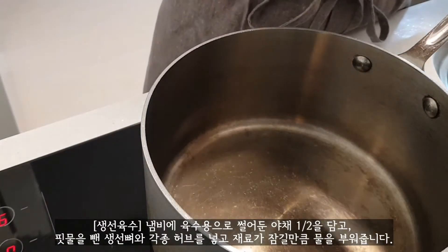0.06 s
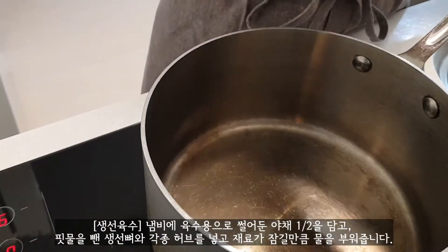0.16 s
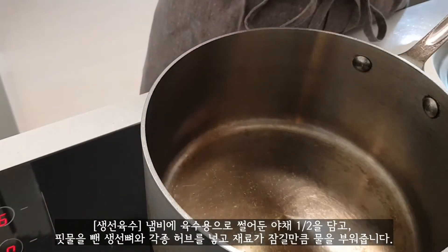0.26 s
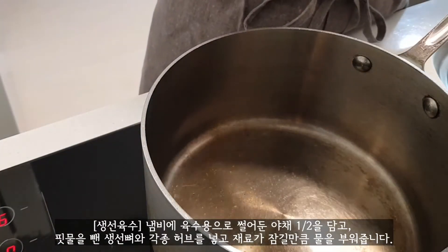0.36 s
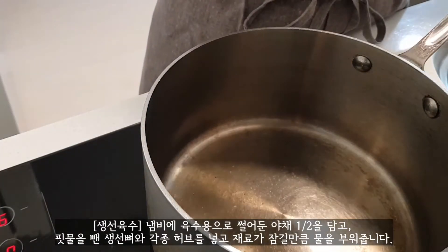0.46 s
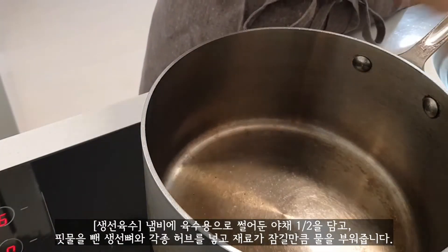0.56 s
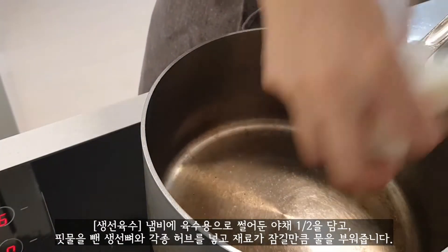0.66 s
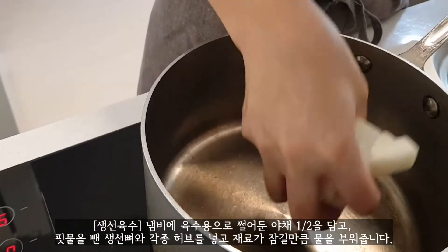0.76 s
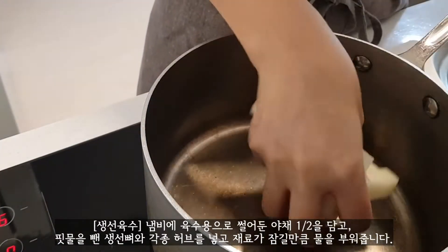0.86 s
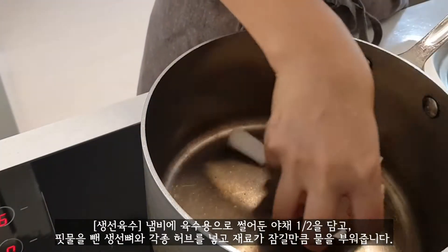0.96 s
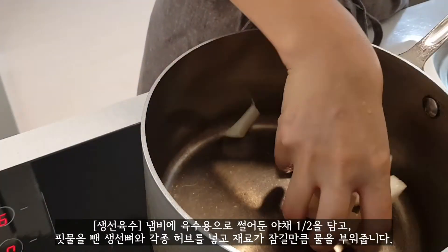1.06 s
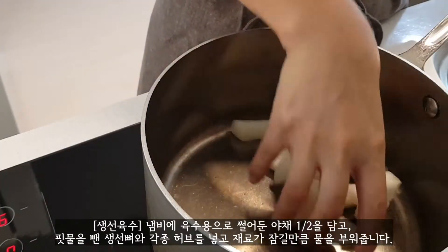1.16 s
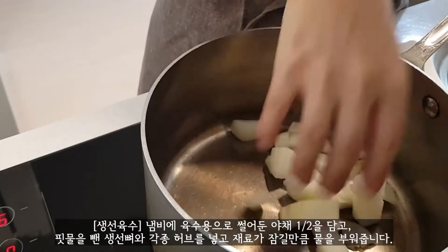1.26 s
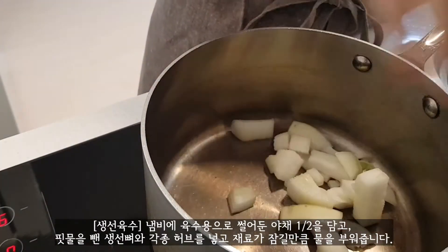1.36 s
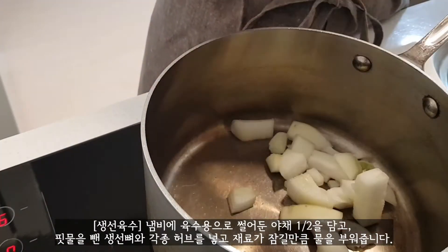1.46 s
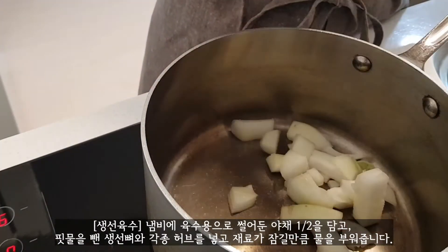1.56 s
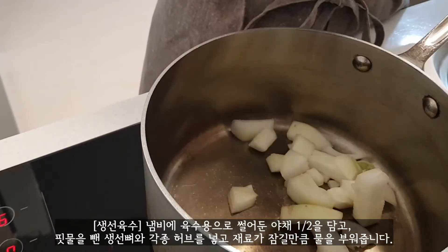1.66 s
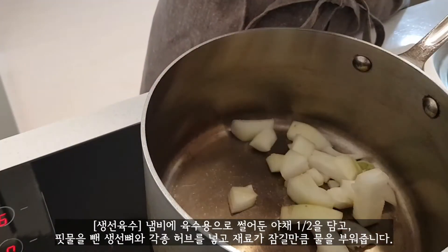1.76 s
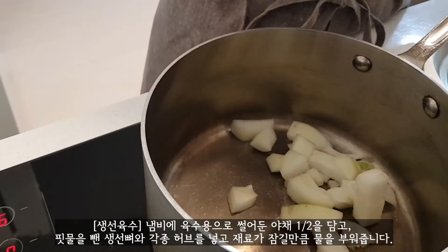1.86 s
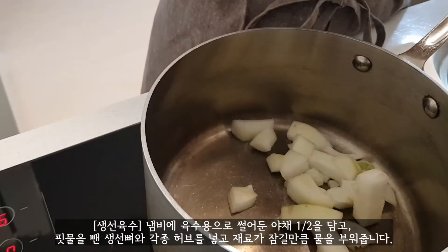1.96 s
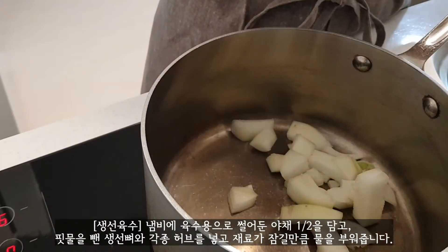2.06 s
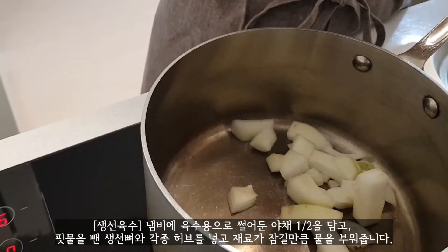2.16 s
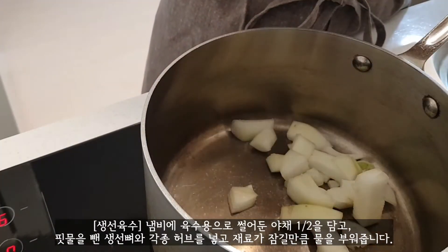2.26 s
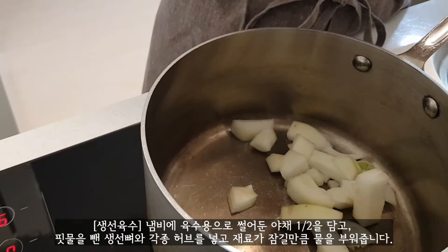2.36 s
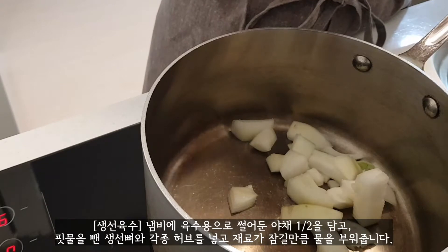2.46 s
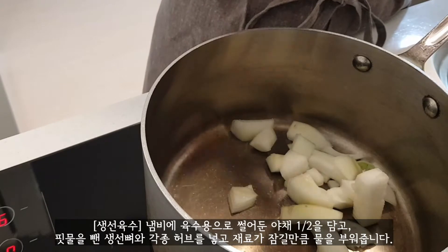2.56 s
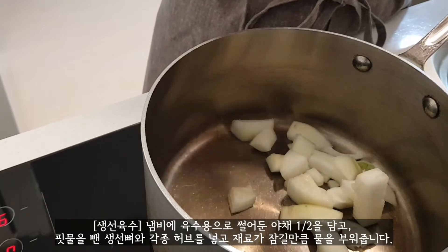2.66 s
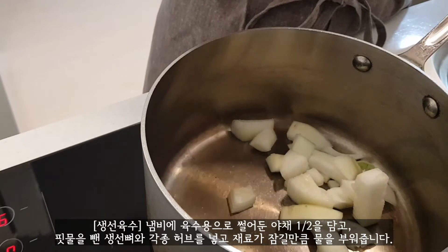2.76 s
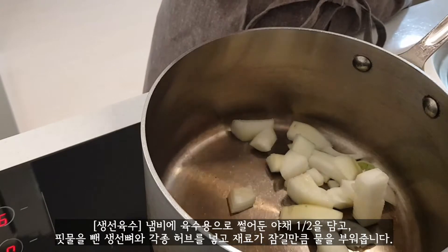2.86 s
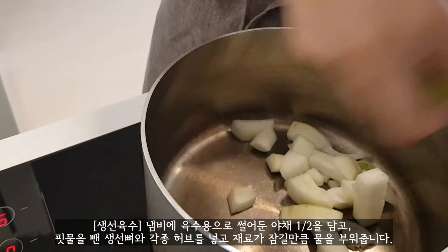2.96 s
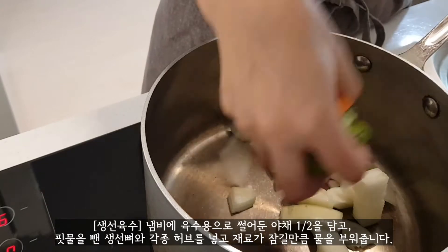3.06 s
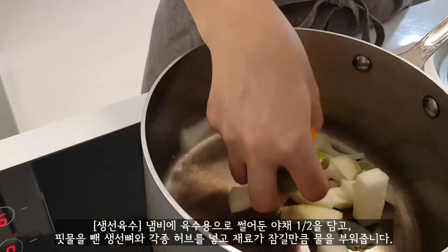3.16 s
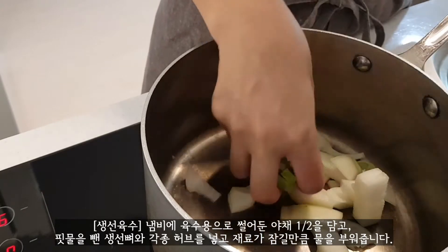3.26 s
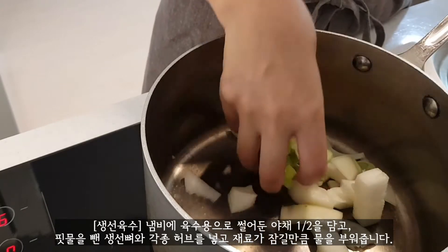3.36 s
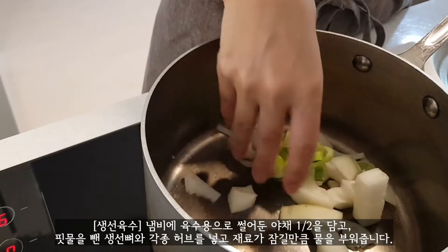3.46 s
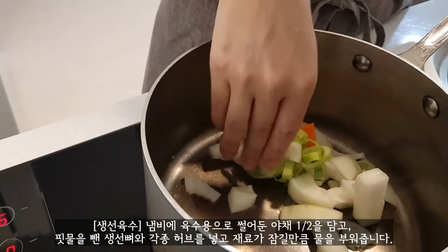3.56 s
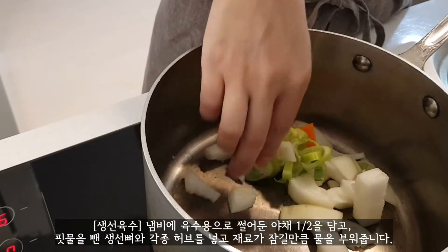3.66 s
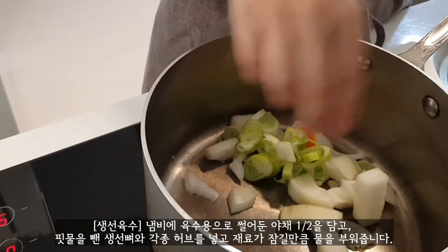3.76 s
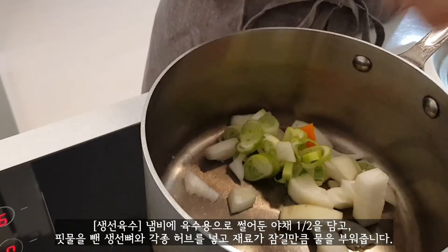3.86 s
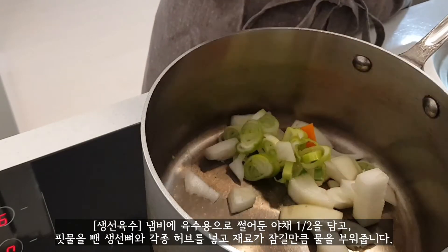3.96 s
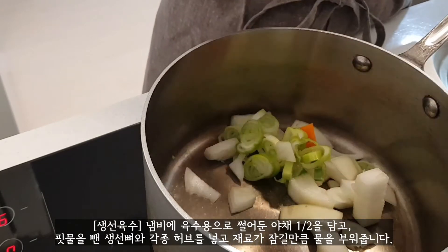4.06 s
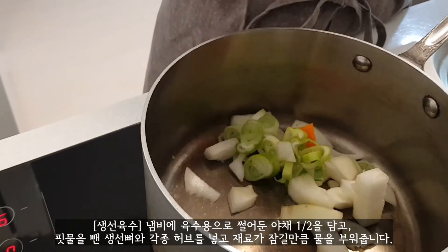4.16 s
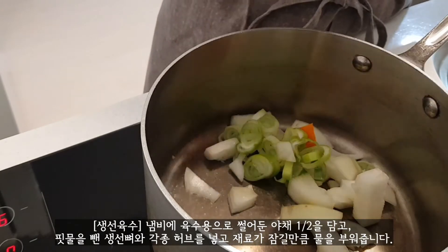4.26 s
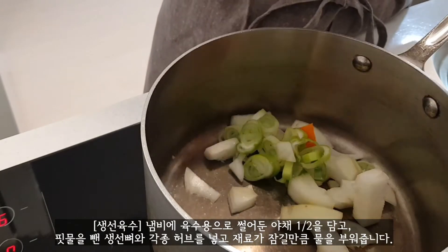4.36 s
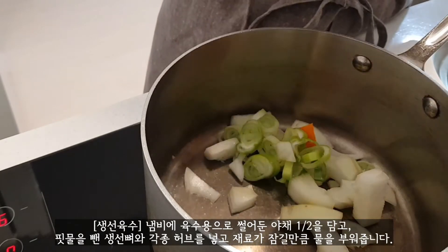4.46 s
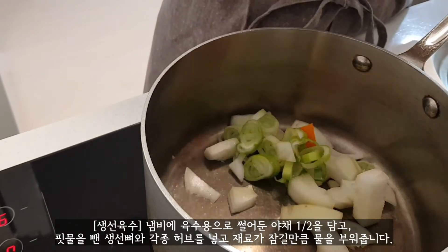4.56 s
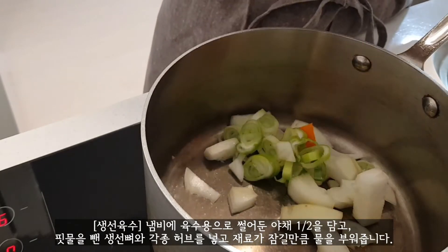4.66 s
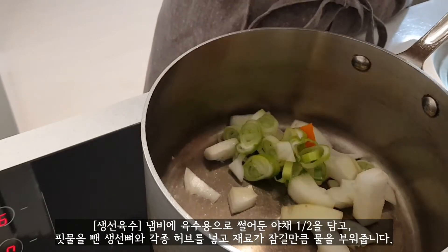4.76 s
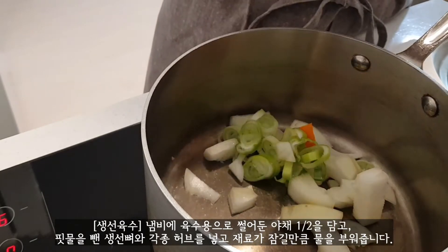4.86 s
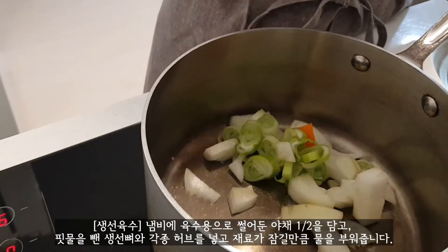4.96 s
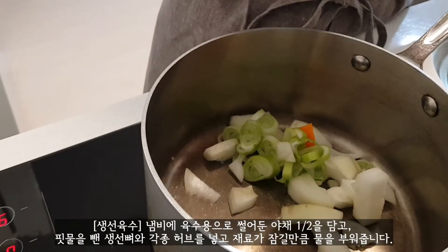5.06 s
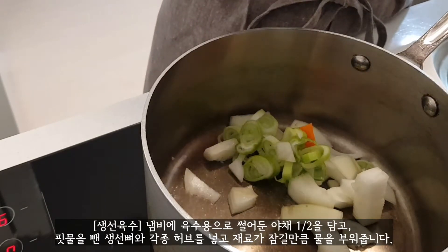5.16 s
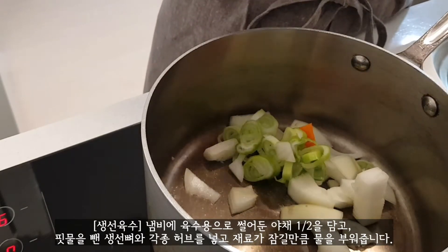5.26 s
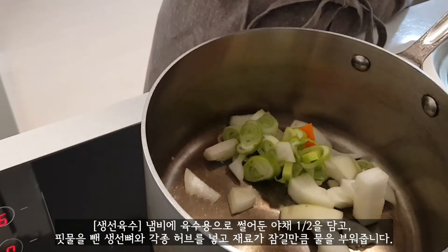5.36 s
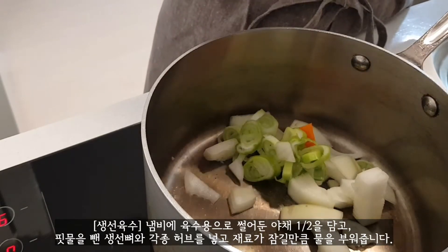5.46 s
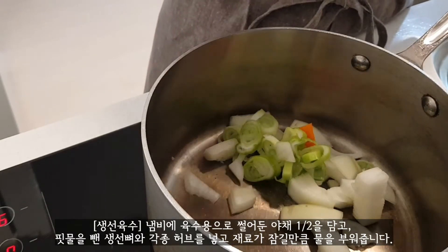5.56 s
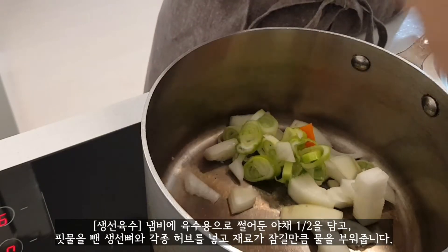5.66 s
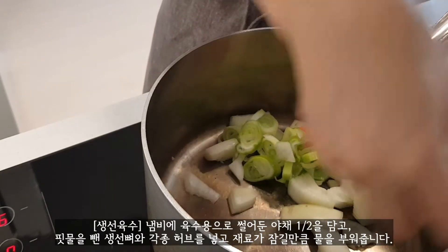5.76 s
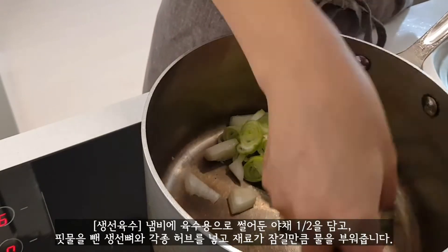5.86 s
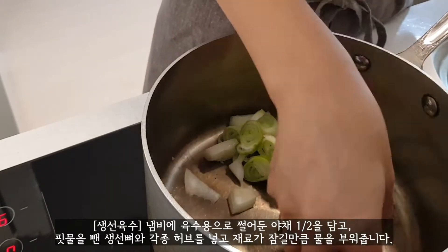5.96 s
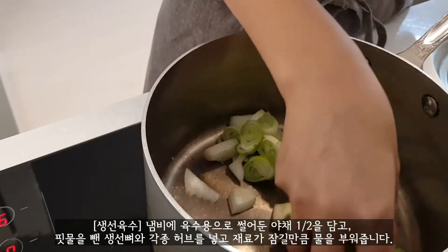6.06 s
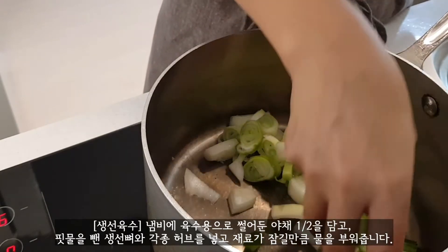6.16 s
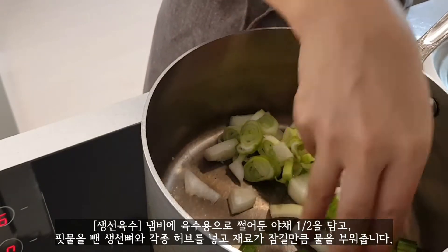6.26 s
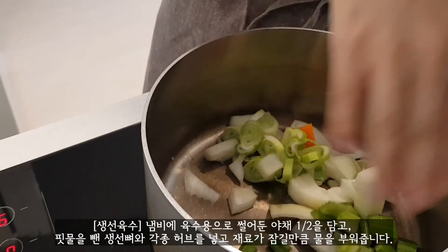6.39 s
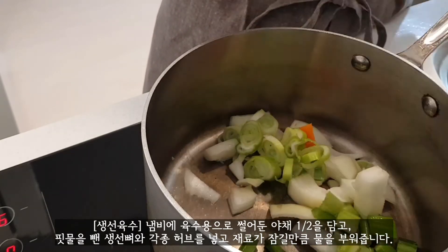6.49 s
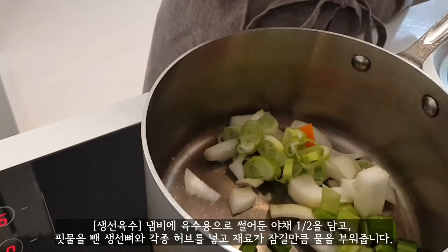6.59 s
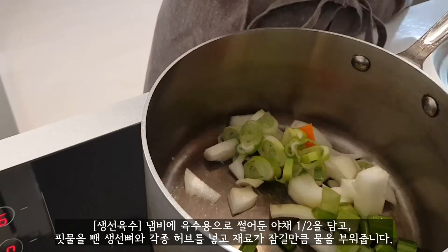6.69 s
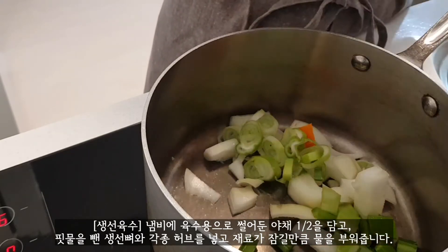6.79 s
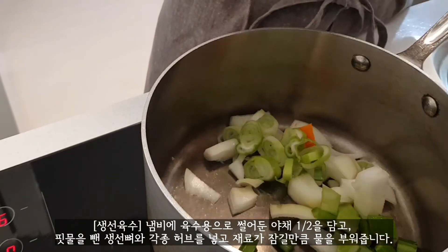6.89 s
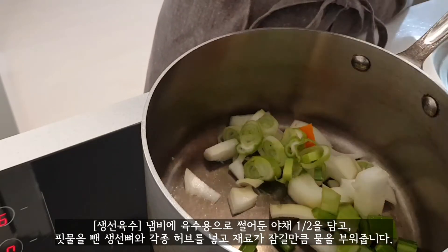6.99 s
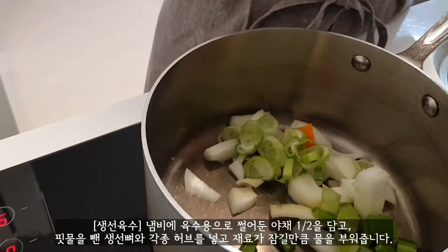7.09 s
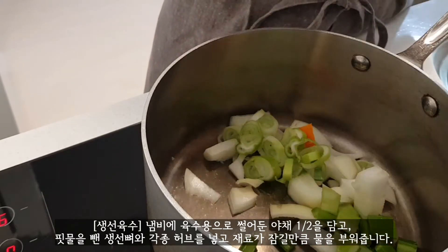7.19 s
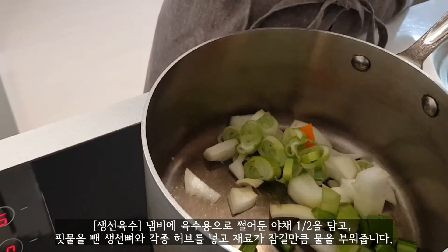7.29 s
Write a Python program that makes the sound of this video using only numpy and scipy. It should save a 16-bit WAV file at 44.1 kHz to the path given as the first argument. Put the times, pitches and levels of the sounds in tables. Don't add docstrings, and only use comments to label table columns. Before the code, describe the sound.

A close stereo kitchen scene lasting about 7.5 seconds, with a constant fine, high hiss like a gas flame and a low rumbling extractor fan with an unsteady hum. From 0.97 to 1.4 s a handful of chopped vegetables patters into a steel saucepan: short, damped, hollow taps, small wet clicks and faint pan thuds. At 3.1 to 3.3 s a few more pieces drop. Two dull counter bumps come at 4.3 s, then at 4.7 s an unseen metal bowl lands with a loud bright clank, bouncing once a tenth of a second later, its short ring quickly damped. The background dips slightly. At 5.85 s a heavy low thump and hand knock on the pan precede the fullest handful, pattering until about 6.5 s. Dull room reflections fade; hiss and hum continue alone, swelling back near 7.3 s, with a very faint airy whistle at the end.

```python
import sys
import numpy as np
from scipy import signal
from scipy.fft import rfft, irfft
from scipy.io import wavfile
from scipy.ndimage import uniform_filter1d, map_coordinates

SR = 44100
rng = np.random.default_rng(int(sys.argv[2]) if len(sys.argv) > 2 else 0)


def elevation(decibels):
    levels = np.asarray(decibels, float)
    return 10 ** (levels / 20)


def digitize_waveform(pressure):
    field = np.atleast_2d(pressure).T
    bounded = np.clip(field, -1, 1)
    quanta = np.round(bounded * 32767).astype(np.int16)
    wavfile.write(sys.argv[1], SR, quanta)


N = 323253

# start_s, peak_db, brightness_db, favoured_mode_hz
PIECES = [(0.966, -34.5, -3, 1290), (0.984, -39.5, -17, 930), (0.999, -41.5, -4, 1220),
          (1.024, -38, -5, 1300), (1.07, -37.5, -10, 1150), (1.087, -39, -15, 960), (1.104, -39, -21, 930),
          (1.17, -35.5, -11, 910), (1.179, -39, -28, 937), (1.21, -33, -29, 845), (1.249, -46.5, -6, 1120),
          (1.277, -41, -27, 930), (1.373, -41.5, -7.5, 1100), (3.123, -31, -11.5, 890),
          (3.151, -56, -20, 1110), (3.295, -42, -7, 1090), (5.862, -28.5, -14, 1010),
          (6.008, -31.5, -12, 1150), (6.071, -42.5, -21, 1230), (6.112, -35, -8, 1160),
          (6.146, -31.5, -20.5, 1020), (6.196, -33, -18, 1100), (6.228, -35, -11, 955),
          (6.243, -34.5, -6, 1110), (6.279, -43, -8, 947), (6.3, -39, -7, 1100), (6.339, -46, -13, 1120),
          (6.429, -45, -25, 1100), (6.451, -29, -9, 1220), (6.489, -41, -12, 1220)]
PAN_MODE_HZ = [520, 700, 930, 1110, 1220, 1480, 1900, 2090, 2650, 3300]
# level_db, t60_s
PAN_MODES = [(-7, .06), (-3, 0.084), (1.5, 0.069), (-4, 0.082), (-4.5, 0.25), (-3.5, 0.045), (1, 0.049),
             (0.5, 0.069), (-6, 0.04), (-5.5, 0.046)]
# start_s, level_db
PAN_ROCKS = [(0.999, -40.5), (1.024, -37.5), (1.07, -40), (1.144, -42), (1.209, -43), (1.277, -39.5),
             (3.123, -40), (3.296, -45), (5.862, -34), (6.01, -40), (6.112, -40), (6.16, -39), (6.451, -45)]
# pitch_hz, density_db
THUD_COLOUR = [(40, -29), (90, 7), (170, 0), (280, -17), (500, -19.5), (900, -38.5)]
# start_s, peak_db
SKIN_TICKS = [(1, -40), (1.019, -40), (1.0446, -39), (1.072, -42), (1.0897, -45), (1.211, -39.5),
              (1.2494, -45), (1.2894, -49)]
# start_s, swell_s, fade_s, top_db
SETTLING = [
    (.96, .23, 0.22, -55.5),
    (3.11, 0.044, .2, -71),
    (6, .11, .45, -53.5),
]
# start_s, ring_db, crack_tilt_db_per_octave, beating_pair_db, beat_start_rad
BOWL_CONTACTS = [
    (4.691, -16, 1.5, -21, -0.25),
    (4.7875, -23, -3, -23, -0.81),
]
BOWL_CRACK_DB = (-21, -26.5)
BOWL_MODE_HZ = [501, 650, 765, 880, 1556, 1803, 2087, 2306, 2352, 2400, 2611, 2684, 2780, 3435, 3577, 3704,
                4240, 4554, 4651, 4971, 5505, 1259, 6498, 7060, 7843, 8600, 10140, 270, 7280]
# first_level_db, first_t60_s, second_level_db, second_t60_s
BOWL_MODES = [(-16.5, 0.2, -13, 0.12), (-14.5, 0.17, -7, 0.35), (-4, 0.09, -10, 0.31),
              (-16, .08, -12, 0.061), (-19, 0.15, -14, 0.23), (-15, 0.1, -12, 0.19),
              (-5.5, 0.088, -6, 0.086), (-7, 0.14, -15.5, 0.2), (0, 0.13, -8, 0.19), (-22, 0.13, -4, 0.13),
              (-15, 0.148, -8, 0.16), (-1, 0.2, -11, 0.15), (1, 0.092, -22, 0.12), (-6, 0.25, -15, 0.19),
              (-1, 0.16, 1, 0.1), (-18, 0.35, -11, .3), (-3.5, 0.13, -3, 0.067), (-8.5, 0.12, -11, 0.1),
              (-5, 0.081, -18, .08), (-8, 0.19, -22, .1), (-13.5, 0.14, -26, .08), (-24, 0.35, -15.5, 0.33),
              (-8.5, 0.099, -21, .06), (-11.5, .12, -28, .05), (-17.5, 0.29, -34, .08),
              (-29, 0.041, -36, .05), (-17.5, 0.056, -40, .05), (-13.5, 0.22, -13.5, 0.2),
              (-10, 0.043, -30, .05)]
# pitch_hz, density_db
CRACK_COLOUR = [(200, -4), (330, -22.5), (750, -7.5), (1400, -18.5), (2000, -2.5), (2500, -9), (3100, -6),
                (4300, -7), (6000, -14.5), (7200, -21), (10500, -19.5), (16000, -41)]
# pitch_hz, t60_s
CRACK_FADE = [(300, 0.18), (1500, 0.24), (4000, 0.045), (10000, 0.076)]
# start_s, peak_db, pitch_hz, t60_s
COUNTER_BUMPS = [(4.287, -30.5, 83, 0.15), (4.337, -30, 70, 0.15), (4.694, -23, 121, 0.13),
                 (4.714, -24, 64.6, 0.46), (4.719, -20.5, 183, 0.12), (4.792, -26.5, 171, 0.099),
                 (5.847, -9.5, 108, 0.035), (5.866, -24.5, 273, 0.1), (5.864, -35, 507, 0.14),
                 (5.873, -41, 390, 0.06), (5.883, -38, 625, .08), (4.8, -25.5, 223, 0.11),
                 (5.865, -36, 2180, 0.031), (5.879, -18.5, 164, 0.071), (5.89, -31, 96, .12),
                 (5.913, -18, 101, 0.07), (5.939, -24, 70, 0.078)]
# pitch_hz, density_db
KNOCK_COLOUR = [(150, -4), (300, -5), (700, -0.5), (1100, -17.5), (2200, -14.5), (4000, -15.5),
                (7000, -49.5)]
# pitch_hz, density_db
WALL_COLOUR = [(150, -10), (450, 0), (650, -9), (780, -3.5), (1200, -2.5), (3000, -4.5), (8000, -10.5)]
# pitch_hz, t60_s
WALL_DECAY = [(300, 0.32), (1200, 0.25), (4000, .25)]
# pitch_hz, density_db
FAR_COLOUR = [(300, -23), (650, -13), (790, -1.5), (950, -2), (1200, -21), (1600, -10), (2500, -14),
              (5000, -32)]
# pitch_hz, t60_s
FAR_DECAY = [(400, 1.4), (900, 1.37), (2500, 0.74)]
# pitch_hz, density_db
FLAME_COLOUR = [(1470, -42), (2500, -22.5), (2790, -23), (3530, -1.5), (4250, -3), (4670, 1.5),
                (5550, -1.5), (8140, -2.5), (11700, -9), (14600, -26.5), (15600, -22.5), (16200, -46)]
# pitch_hz, density_db
FAN_COLOUR = [(11, -44), (18, -32.5), (45, -1), (91, -5), (124, -1.5), (146, -8), (167, -10), (234, -19),
              (291, -37.5), (320, -31), (420, -59), (700, -120)]
# pitch_hz, density_db
DUCT_COLOUR = [(150, -35), (260, 1.5), (297, -10), (447, -5), (543, -2.5), (694, -1.5), (1710, -13),
               (1930, -16), (2630, -25), (3000, -14), (3900, -24), (6600, -120)]
# centre_s, pitch_hz, level_db, half_length_s
DUCT_WHISTLES = [(0.26, 760, -60, 0.1), (0.32, 900, -71, 0.038), (7.6, 990, -57, 0.055),
                 (2.3, 270, -59.5, .05), (6.1, 270, -74, 0.05)]
# pitch_hz, likeness (0 to 1)
PORT_LIKENESS = [(30, 0.75), (130, 0.93), (290, 0.45), (700, 0.58), (1500, 0.2), (4000, 0.071),
                 (8000, 0.034), (15000, 0.1)]
# pitch_hz, difference_db
PORT_TILT = [(60, 5.5), (110, 6.5), (200, 3.5), (380, 11.5), (700, 11), (1290, 11), (2380, 11), (4400, 5),
             (8120, 8.5), (15000, 1.5)]
# time_s, gain_db
GAIN_RIDE = [
    (0, 0.5),
    (4.69, 0),
    (4.74, -2.5),
    (7.0, -2.5),
    (7.33, 1),
]

TOP_HZ = 15120


def unit(x):
    return x / np.sqrt(np.mean(x ** 2) + 1e-20)


def along(points, hz):
    f, v = np.transpose(points)
    return np.interp(np.log(hz + 1), np.log(f + 1), v)


def wobble(rate_hz):
    knots = rng.standard_normal(int(N * rate_hz / SR) + 4)
    return map_coordinates(knots, [np.arange(N) * rate_hz / SR])


def lean_left(db):
    return elevation([[db], [-db]])


def rise(t, time_s):
    return 1 - np.exp(-t / time_s)


def add(track, start_s, sound):
    track[:, round(start_s * SR):][:, :sound.shape[1]] += sound


def ring(modes, attack_s, scatter_db, spread_rad, size=SR // 4):
    t = np.arange(size) / SR
    hz, db, t60 = np.transpose(modes)[:, :, None]
    draw = rng.standard_normal((3, len(modes), 1))
    decay_db = db + scatter_db * draw[0] - 60 * t / np.clip(t60, 0.01, 0.4)
    envelope = elevation(decay_db) * rise(t, attack_s)
    turn = spread_rad * np.sign(draw[1]) * np.minimum(hz / 1800, 1.1)
    detune = 1 + 0.0013 * scatter_db * draw[2]
    phase = 2 * np.pi * hz * t * detune
    return np.array([(envelope * np.sin(phase + p)).sum(0) for p in (turn, -turn)])


def burst(colour, fade, hold_s, size=SR // 4, bins=128):
    hz, t, z = signal.stft(rng.standard_normal((2, size)), SR, nperseg=bins)
    like = np.clip(along(PORT_LIKENESS, hz), 0, 1)[:, None]
    z[1] = like * z[0] + np.sqrt(1 - like ** 2) * z[1]
    decay_db = 60 * np.maximum(t - hold_s, 0) / along(fade, hz)[:, None]
    shape = elevation(along(colour, hz)[:, None] - decay_db)
    x = signal.istft(z * shape, SR, nperseg=bins)[1][:, :size]
    return x / np.std(x[:, :2 * bins])


def rush(colour, patchy_db, lag_s):
    z = signal.stft(rng.standard_normal((2, N + 512)), nperseg=512)[2]
    patches = uniform_filter1d(rng.standard_normal(z.shape[1:]), 5, 0)
    patches = unit(uniform_filter1d(patches, 10, 1))
    left, other = rfft(signal.istft(z * elevation(patchy_db * patches), nperseg=512)[1][:, :N])
    hz = np.fft.rfftfreq(N, 1 / SR)
    like = np.clip(along(PORT_LIKENESS, hz), 0, 1)
    right = like * left * np.exp(-2j * np.pi * hz * lag_s) + np.sqrt(1 - like ** 2) * other
    tilt = elevation(along(PORT_TILT, hz) / 2)
    shape = elevation(along(colour, hz)) * (hz < TOP_HZ)
    pair = irfft(shape * np.array([left * tilt, right / tilt]), N)
    return pair / np.std(pair.mean(0))


def pan_floor(spot_hz, bright_db):
    modes = []
    for hz, (level_db, t60) in zip(PAN_MODE_HZ, PAN_MODES):
        distance = abs(np.log2(hz / spot_hz))
        push_db = bright_db + 6 if hz > 1400 else -22 * distance
        damping = rng.uniform(0.52, 1.37) * np.clip(1 - 6 * distance, 0.5, 1)
        modes.append((hz * rng.normal(1, 0.018), level_db + push_db, t60 * damping))
    return modes


def vegetables():
    track = np.zeros((2, N + SR))
    t = np.arange(SR // 4) / SR
    patter_fade = [(500, 0.14), (1500, 0.061), (4000, 0.062)]
    for s, db, bright_db, spot_hz in PIECES:
        tap = ring(pan_floor(spot_hz, bright_db), attack_s=0.0005, scatter_db=2.5, spread_rad=0.6)
        colour = [(350, -12.5), (900, 0.5), (2200, bright_db), (2800, bright_db - 13), (9000, bright_db - 36)]
        patter = rise(t, 0.0016) * burst(colour, patter_fade, hold_s=0.0059)
        add(track, s, elevation(db) * lean_left(4.5) * (elevation(-5) * tap + elevation(-12) * patter))
    for s, db in PAN_ROCKS:
        thud = burst(THUD_COLOUR, [(100, 0.22), (400, 0.1)], hold_s=0.0027, bins=512)
        add(track, s, elevation(db) * rise(t, 0.0034) * thud * lean_left(3))
    tick_colour = [(2000, -4), (7000, -3), (12000, -4), (15400, -10), (15700, -60)]
    for s, db in SKIN_TICKS:
        tick = burst(tick_colour, [(8000, 0.061)], hold_s=0, size=3000, bins=64)
        add(track, s, elevation(db - 4.5) * tick * lean_left(2.5))
    return track[:, :N]


def tumble():
    t = np.arange(N) / SR
    edge_db, rate_hz = -9, 500
    level = np.zeros(N)
    for s, swell, fade, db in SETTLING:
        swell_db = np.interp(t - s, [0, swell, swell + fade], [edge_db, 0, edge_db])
        level += elevation(db + swell_db) * (t > s) * (t < s + swell + fade)
    draw = rng.random((2, N))
    strength = elevation(-2.5 * np.log(1 - draw[1]))
    contacts = (draw[0] < rate_hz / SR) * strength * np.sign(draw[0] * SR - rate_hz / 2)
    modes = [(hz, db, 0.5 * t60) for hz, (db, t60) in zip(PAN_MODE_HZ, PAN_MODES)]
    floor = ring(modes, attack_s=0.00083, scatter_db=0, spread_rad=0.76, size=SR // 8)
    floor = floor / np.linalg.norm(floor[0])
    murmur = signal.fftconvolve(unit(contacts)[None] * level, floor, axes=1)[:, :N]
    return elevation(-4.5) * murmur * lean_left(4)


def rim_beat(t, pair_db, start_rad):
    rim_hz, split_hz = 1197, 6.3
    centre = 2 * np.pi * rim_hz * t + np.array([[0.6], [-0.6]])
    beat = 2 * np.pi * split_hz * t + start_rad
    pair = np.cos(centre - beat) - 0.85 * np.cos(centre + beat)
    return elevation(pair_db - 60 * t / 0.35) * pair * rise(t, 0.002)


def bowl():
    track = np.zeros((2, N + SR))
    t = np.arange(SR // 2) / SR
    bounce_s = BOWL_CONTACTS[1][0] - BOWL_CONTACTS[0][0]
    chokes = (elevation(-14 * np.clip((t - bounce_s) / 0.01, 0, 1)),
              elevation(-13 * np.clip((t - 0.078) / 0.018, 0, 1)))
    first_db, first_t60, second_db, second_t60 = np.transpose(BOWL_MODES)
    rings = (np.transpose([BOWL_MODE_HZ, first_db, first_t60]),
             np.transpose([BOWL_MODE_HZ, second_db, second_t60]))
    for contact, crack_db, modes, choke in zip(BOWL_CONTACTS, BOWL_CRACK_DB, rings, chokes):
        s, ring_db, tilt_db, pair_db, start_rad = contact
        tone = ring(modes, attack_s=0.00059, scatter_db=2, spread_rad=0.88, size=SR // 2)
        pair = rim_beat(t, pair_db, start_rad)
        colour = [(hz, db + tilt_db * np.log2(hz / 2000)) for hz, db in CRACK_COLOUR]
        crack = elevation(crack_db) * burst(colour, CRACK_FADE, hold_s=0.011, size=SR // 2)
        add(track, s, choke * elevation(ring_db) * tone + choke ** 0.41 * pair + crack)
    return track[:, :N] * lean_left(2.8)


def counter():
    track = np.zeros((2, N + SR))
    for s, db, hz, t60 in COUNTER_BUMPS:
        add(track, s, ring([(hz, db, t60)], attack_s=0.0023, scatter_db=0.5, spread_rad=0.6))
    knock_fade = [(300, 0.19), (1000, 0.12), (3000, 0.064)]
    knock = burst(KNOCK_COLOUR, knock_fade, hold_s=0.0074, bins=256)
    add(track, 5.861, elevation(-35.5) * rise(np.arange(SR // 4) / SR, 0.0015) * knock)
    return track[:, :N] * lean_left(3)


def walls(near):
    early = burst(WALL_COLOUR, WALL_DECAY, hold_s=0.027, size=SR * 3 // 4, bins=256)
    late = burst(FAR_COLOUR, FAR_DECAY, hold_s=0.076, size=SR * 3 // 4, bins=256)
    tail = early / np.linalg.norm(early[0]) + elevation(-12) * late / np.linalg.norm(late[0])
    delayed = np.pad(tail, ((0, 0), (600, 0)))
    return elevation(-16) * signal.fftconvolve(near, delayed, axes=1)[:, :N]


def flame():
    return elevation(-48 + 0.25 * wobble(3)) * rush(FLAME_COLOUR, patchy_db=0.7, lag_s=0.0004)


def fan():
    t = np.arange(N) / SR
    rumble = elevation(-45.5 + 0.54 * wobble(3.46)) * rush(FAN_COLOUR, patchy_db=0.77, lag_s=0)
    hum_db = -45 + 1.8 * wobble(4.5) + 0.66 * wobble(9.4)
    hum = elevation(hum_db) * np.sin(2 * np.pi * 120 * t + 0.77 * wobble(6))
    return rumble + hum * lean_left(3)


def duct():
    t = np.arange(N) / SR
    tone = elevation(-60 + 0.71 * wobble(2.65)) * rush(DUCT_COLOUR, patchy_db=1.5, lag_s=0.00026)
    whistle = np.zeros(N)
    for s, hz, db, half_s in DUCT_WHISTLES:
        swell = np.exp(-((t - s) / half_s) ** 2)
        whistle += elevation(db) * swell * np.sin(2 * np.pi * hz * t + 2.1 * wobble(30))
    return tone + whistle * lean_left(4.5)


def scene():
    near = vegetables() + tumble() + bowl() + counter()
    return near + walls(near) + flame() + fan() + duct()


def roll_off(x):
    return signal.sosfilt(signal.butter(12, 16380, fs=SR, output="sos"), x)


def record(dry):
    clipped = dry / (1 + np.abs(dry / 0.72) ** 5) ** (1 / 5)
    in_band = np.fft.rfftfreq(N, 1 / SR) < TOP_HZ + 330
    limited = irfft(rfft(clipped) * in_band, N)
    time_s, gain_db = np.transpose(GAIN_RIDE)
    mix = limited * elevation(np.interp(np.arange(N) / SR, time_s, gain_db))
    return roll_off(mix)


dry = scene()
out = record(dry)
digitize_waveform(out)
```